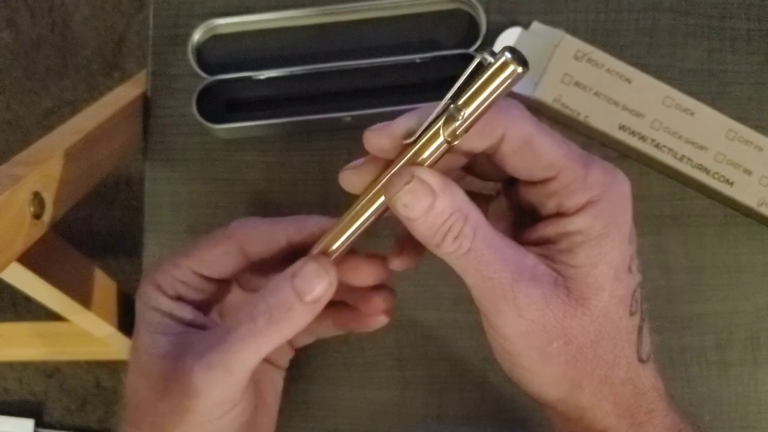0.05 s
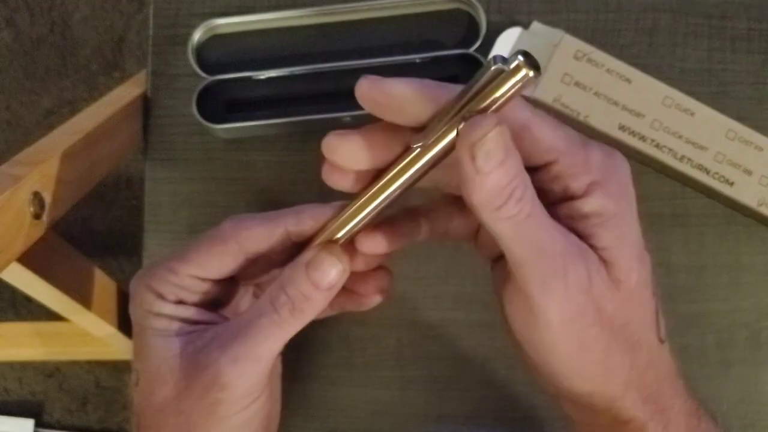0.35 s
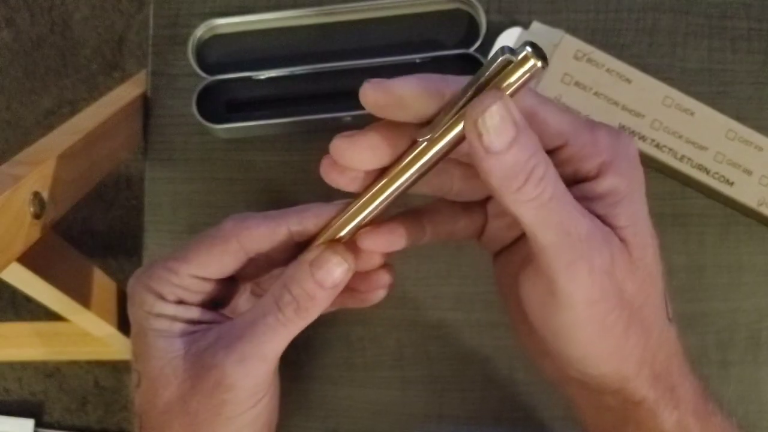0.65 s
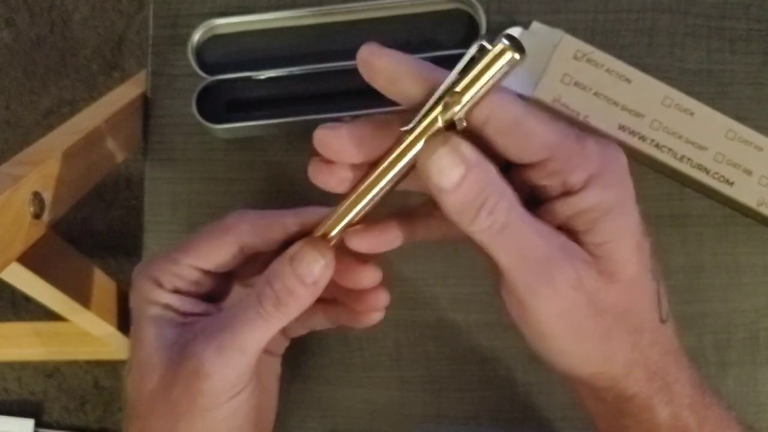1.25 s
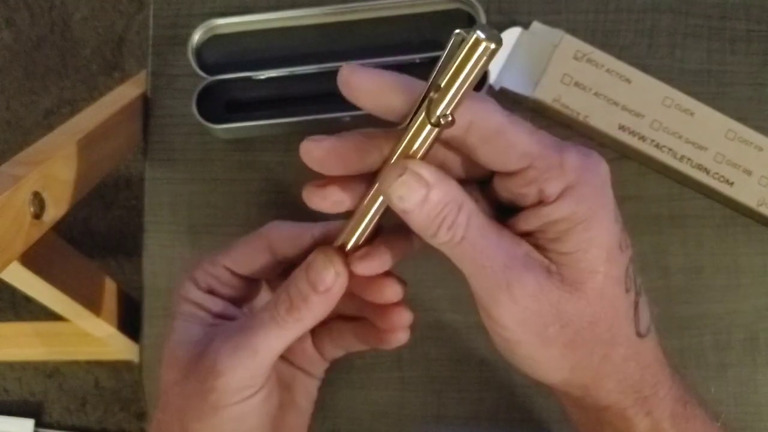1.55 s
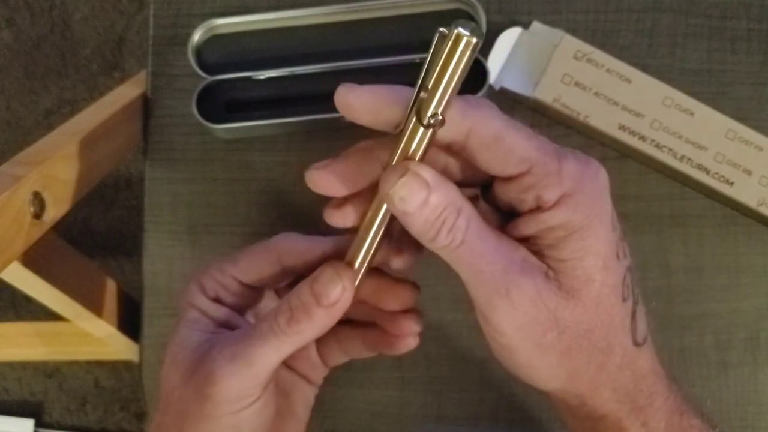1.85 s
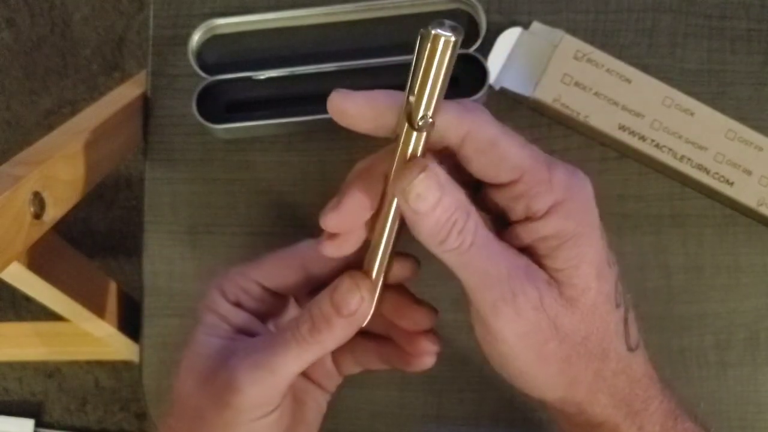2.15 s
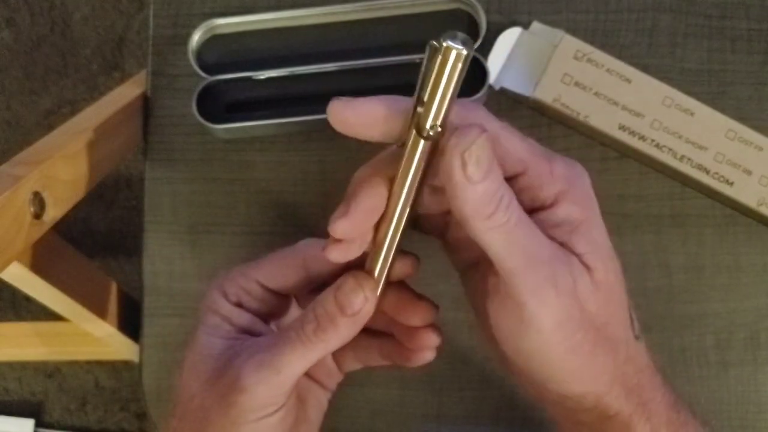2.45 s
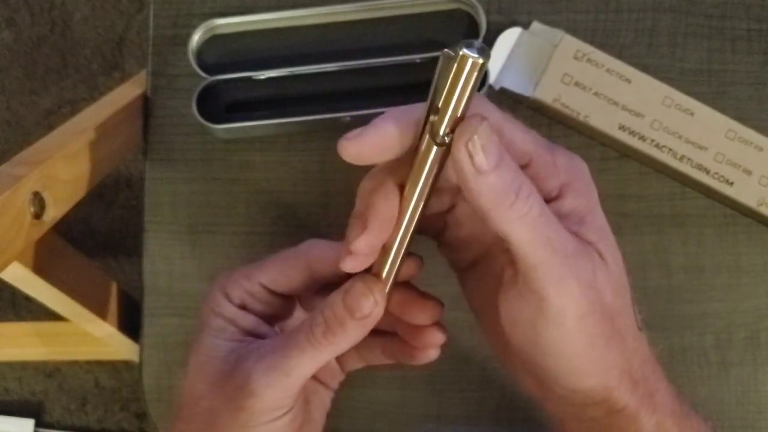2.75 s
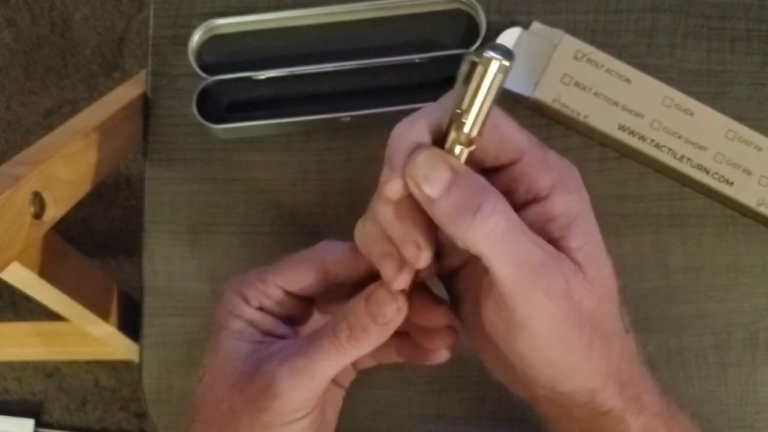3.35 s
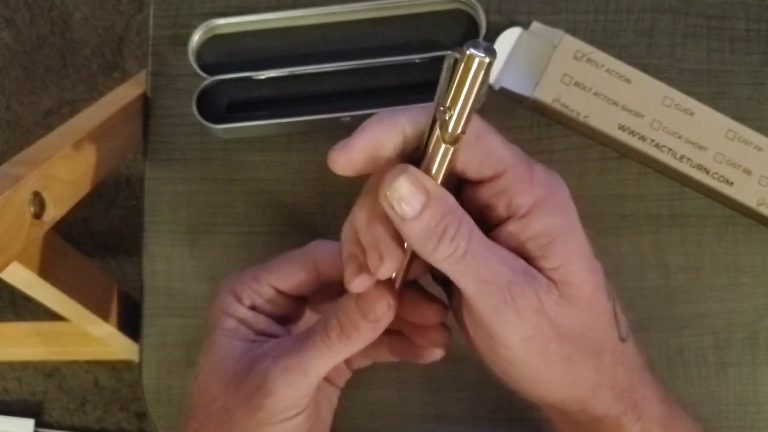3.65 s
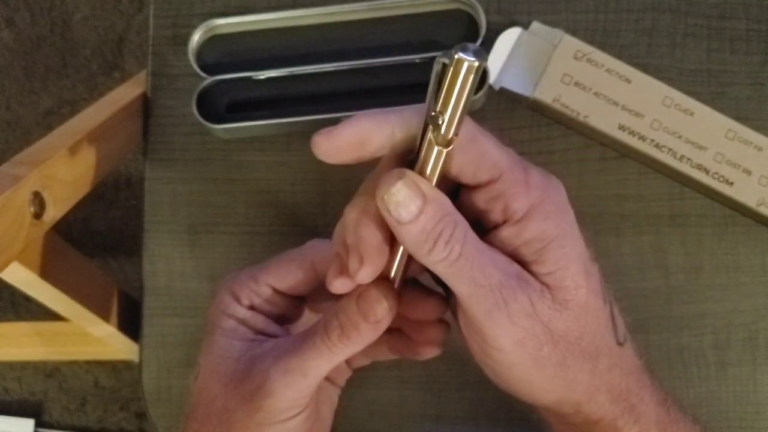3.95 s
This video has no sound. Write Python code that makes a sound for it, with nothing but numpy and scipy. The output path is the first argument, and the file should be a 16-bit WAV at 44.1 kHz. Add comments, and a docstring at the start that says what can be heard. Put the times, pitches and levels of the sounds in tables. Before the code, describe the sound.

Two sharp metallic snaps come from a pen's bolt, first locking and then springing home, with faint handling ticks before each. The pen is near the microphone, slightly right, in a small room with soft ventilation and fan hum.

```python
"""A metal bolt-action pen is worked by hand close by, a little to the right.
Fingers shift on it; the bolt scrapes along its slot and snaps into the lock, and a faint hiss lingers.
Later a thumbnail nudges it out and it springs home. Each snap is a blow and a rebound that
ring the modes of the pen, and a small room answers. Behind it, ventilation rushes and a fan hums."""
import sys
import numpy as np
from scipy import signal
from scipy.fft import rfft, irfft, next_fast_len
from scipy.io import wavfile
from scipy.ndimage import map_coordinates

SR = 44100
rng = np.random.default_rng(int(sys.argv[2]) if len(sys.argv) > 2 else 0)


def dump(signal):
    """Clip the signal to [-1, 1] and save it as 16-bit WAV at the path in sys.argv[1]."""
    limited = np.clip(np.atleast_2d(signal).T, -1, 1)
    pcm = np.round(limited * 32767).astype(np.int16)
    wavfile.write(sys.argv[1], SR, pcm)


N = 176400
TIME = np.arange(N) / SR
CONTACT_RISE_S = 0.00011


def amp(db):
    return 10 ** (np.asarray(db) / 20)


def unit_rms(x):
    return x / np.sqrt(np.mean(x ** 2) + 1e-20)


def decay(t, t60):
    """Exponential damping: 60 dB down after t60 seconds."""
    return np.exp(-np.log(1000) * t / t60)


def over_time(points):
    return np.interp(TIME, *np.transpose(points))


def over_frequency(points, hz):
    """Interpolate (Hz, value) points on a log axis."""
    knots, values = np.transpose(points)
    return np.interp(np.log(hz + 1), np.log(knots + 1), values)


def filtered(x, response):
    """Multiply the spectrum of x by a frequency response."""
    size = next_fast_len(x.shape[-1] + SR // 4)
    return irfft(rfft(x, size) * response(np.fft.rfftfreq(size, 1 / SR)), size)[..., :x.shape[-1]]


def coloured(x, gains_db):
    return filtered(x, lambda hz: amp(over_frequency(gains_db, hz)))


def tilted(x, slope_db):
    """Brighten or dull by slope_db an octave, between 4 and 16 kHz."""
    return filtered(x, lambda hz: amp(slope_db * np.log2(np.clip(hz, 4000, 16000) / 12000)))


def add(track, start_s, x):
    i = max(0, round(start_s * SR))
    track[..., i:i + x.shape[-1]] += x[..., :N - i]


def wobble(knots_per_s):
    """A smooth random curve."""
    knots = rng.standard_normal(int(N * knots_per_s / SR) + 4)
    return map_coordinates(knots, [TIME * knots_per_s])


def hum(hz, width_hz):
    """Narrow-band noise is heard as a wavering tone."""
    return unit_rms(filtered(rng.standard_normal(N), lambda f: 1 / (1 + ((f - hz) / width_hz * 2) ** 4)))


def ventilation():
    """Broadband air noise, coherent between the channels only in the bass, carries narrow duct tones."""
    # Each row: frequency in Hz, relative spectral density in dB.
    spectrum = [(20, -17), (40, -4.5), (50, -5), (62, -4.5), (76, 0.5), (110, -4), (140, -9), (200, -12.5),
                (260, -18.5), (380, -21), (600, -18), (880, -14), (1200, -21), (1500, -26), (1850, -22),
                (2300, -28), (3000, -38.5), (3500, -38), (4300, -43.5), (7000, -49), (9000, -65.5),
                (14000, -55)]
    # Each row: frequency in Hz, left-right correlation.
    coherence = [(60, 1), (100, 0.82), (160, 0.93), (300, 0.71), (600, 0), (1200, 0), (10000, 0.068)]
    # Each row: frequency in Hz, bandwidth in Hz, level in dB.
    duct_tones = [(65.2, 17.8, -51.5), (283.2, 4.4, -74.5), (895, 32, -74)]
    # Each row: time in seconds, gain in dB; for a fading whir, a swelling whir and the whole mix.
    fading_db = [(0, -66), (.12, -57), (.45, -62), (.8, -63), (1.15, -70.5), (1.5, -64.5), (1.9, -73.5)]
    swelling_db = [(0, -73), (1.7, -75.5), (2.27, -61), (2.6, -69), (3.1, -61.5), (4, -73)]
    overall_db = [(0, 1.05), (1.2, 0), (2.0, -0.17), (3.3, .5), (3.55, -2.5), (4, -2.5)]

    def mid_side_gains(hz):
        angle = np.arccos(np.clip(over_frequency(coherence, hz), -1, 1)) / 2
        return amp(over_frequency(spectrum, hz)) * [np.cos(angle), np.sin(angle)]

    mid, side = filtered(rng.standard_normal((2, N)), mid_side_gains)
    air = amp(-48.5) * unit_rms(np.array([mid + side, mid - side]))
    tones = sum(amp(db) * hum(hz, width) for hz, width, db in duct_tones)
    low_whir = amp(over_time(fading_db)) * hum(483, width_hz=77)
    high_whir = amp(over_time(swelling_db)) * hum(879, width_hz=130)
    return (air + tones + low_whir + high_whir) * amp(over_time(overall_db))


def fan_drone():
    """The fan's low hum is a sinusoid slowly modulated in amplitude and frequency."""
    # Each row: time in seconds, level in dB before trim and flutter.
    swells = [(0.0, -41), (0.76, -52), (0.821, -41), (1.43, -48), (1.57, -39), (1.88, -64), (1.92, -47.5),
              (2.1, -43), (2.33, -61), (2.57, -39.5), (2.95, -52.5), (3.02, -42), (3.29, -48), (3.4, -72.5),
              (3.54, -41), (3.59, -61), (3.64, -41.5), (4.0, -61)]
    trim_db, flutter_db = -1.5, 2
    level_db = over_time(swells) + trim_db + flutter_db * wobble(8.9)
    pitch_hz = 91.36 + 2 * wobble(6.5)
    return np.sqrt(2) * amp(level_db) * np.sin(2 * np.pi * np.cumsum(pitch_hz) / SR)


def metal_contact(stroke=0, delay_s=0):
    """An impact excites the pen's damped modes and a crack of noise; stroke 0 locks, 1 springs home."""
    # Each row: frequency in Hz, T60 in seconds, level in dB on locking, level in dB on springing home.
    modes = [(347, 0.016, -52, -26), (1400, 0.00307, -36.5, -18.5), (2230, 0.006, -38.5, -17),
             (3550, 0.0022, -26.5, -33), (4125, 0.0045, -23, -17.5), (4980, 0.0058, -13.5, -15),
             (6050, 0.007, -15, -10), (7070, 0.0046, -12.5, -9.5), (8040, 0.0058, -13.5, -9.5),
             (9330, .0035, -11.5, -4.5), (10320, 0.0022, -6, -2.5), (11370, 0.003, -3.5, -0.5),
             (12230, 0.006, -6, -2.5), (13550, 0.0049, -0.5, -2.5), (14150, .004, -4.5, -2.5)]
    t = np.maximum(np.arange(SR // 25) / SR - delay_s, 0)
    ring = sum((-1) ** k * amp(levels[stroke]) * np.sin(2 * np.pi * hz * t) * decay(t, t60)
               for k, (hz, t60, *levels) in enumerate(modes))
    crack = np.diff(rng.standard_normal(len(t) + 1)) / 2 * decay(t, t60=0.017)
    return (ring + amp(-10.5) * crack) * (1 - np.exp(-t / CONTACT_RISE_S))


def bolt_slides():
    """Stick-slip friction: a dense random train of tiny slips rings the pen."""
    # Each row: start in seconds, length in seconds, level in dB, treble tilt in dB per octave.
    slides = [(.0, .12, -71, -10), (0.634, 0.031, -75, -1), (0.935, 0.013, -45.5, 9),
              (0.991, .003, -49, -5), (0.948, 0.25, -68, -5), (2.975, 0.066, -77.5, 3),
              (3.14, .01, -73.5, -3.5)]
    slips_per_s, rise_s, fall_s = 3100, 0.0017, 0.0055
    out, t = np.zeros(N), np.arange(SR // 2) / SR
    for start, length, db, tilt_db in slides:
        slips = rng.standard_normal(len(t)) * (rng.random(len(t)) < slips_per_s / SR)
        scrape = signal.fftconvolve(slips, metal_contact())[:len(t)]
        envelope = (1 - np.exp(-t / rise_s)) * np.exp(-np.maximum(t - length, 0) / fall_s)
        add(out, start, amp(db) * unit_rms(tilted(scrape, tilt_db)) * envelope)
    return out


def soft_hisses():
    """Swells of filtered noise. At 1.283 s a faint treble hiss lingers after the lock snap;
    the others are the friction of fingers shifting on the barrel."""
    # Each row: start in seconds, length in seconds, level in dB.
    swells = [(0.27, 0.37, -75), (0.623, 0.15, -79), (0.867, 0.138, -68.5), (1.283, 0.16, -76),
              (1.803, 0.046, -67.5), (1.956, 0.057, -69), (2.253, .06, -78.5), (3.624, 0.046, -71.5)]
    # Each row: frequency in Hz, relative level in dB.
    hiss_spectrum = [(500, -17), (3500, 13.5), (6000, 7), (9000, 0.5), (14000, -10)]
    out, t = np.zeros(N), np.arange(SR // 2) / SR
    for start, length, db in swells:
        hiss = unit_rms(coloured(rng.standard_normal(len(t)), hiss_spectrum))
        arch = np.sin(np.pi * np.minimum(t / length, 1)) ** .5
        add(out, start, amp(db) * hiss * arch)
    return out


def bolt_ticks():
    """Light impacts of the bolt in its slot excite the pen's modes weakly."""
    # Each row: start in seconds, gain in dB, treble tilt in dB per octave.
    ticks = [(.6397, -58, 6), (2.984, -67, -1), (3.1462, -57, -6), (3.298, -65.5, -4), (3.3471, -28, -14)]
    out = np.zeros(N)
    for start, db, tilt_db in ticks:
        add(out, start, amp(db) * tilted(metal_contact(), tilt_db))
    return out


def bolt_snaps():
    """Elastic collision: the sprung bolt hits its stop and rebounds once. Gives direct sound and tail."""
    # Each row: start in seconds, gain in dB, rebound re blow in dB, their likeness in the room (0-1).
    strokes = [(1.0975, -8.5, 1.5, .6), (3.3480, -8, -1, .1)]
    # Each entry: gap from blow to rebound in seconds.
    gaps = [.000905, .000845]
    direct, coherent, incoherent = np.zeros((3, N))
    for stroke, (start, db, rebound_db, likeness) in enumerate(strokes):
        blow = amp(db) * metal_contact(stroke)
        rebound = amp(db + rebound_db) * metal_contact(stroke, gaps[stroke])
        add(direct, start, blow + rebound)
        # The rebound stirs the room only partly as the blow did.
        add(coherent, start, blow + likeness * rebound)
        add(incoherent, start, np.sqrt(1 - likeness ** 2) * rebound)
    return direct, reverberation(coherent) + reverberation(incoherent)


def nail_ticks():
    """The impact of the thumbnail on the bolt rings a few heavily damped modes."""
    # Each row: start in seconds, gain in dB.
    touches = [(3.0293, -51), (3.1453, -48), (3.6792, -66)]
    # Each row: frequency in Hz, T60 in seconds, relative level in dB.
    modes = [(4800, .009, 0.5), (7040, 0.0048, 1), (13000, 0.0047, -12.5)]
    out, t = np.zeros(N), np.arange(SR // 2) / SR
    ring = sum(amp(db) * np.sin(2 * np.pi * hz * t) * decay(t, t60) for hz, t60, db in modes)
    for start, db in touches:
        add(out, start, amp(db) * ring * (1 - np.exp(-t / CONTACT_RISE_S)))
    return out


def early_echoes(x):
    """Reflection from the walls adds delayed, weaker copies to the direct sound."""
    # Each row: delay in seconds, gain in dB.
    walls = [(.0045, -22), (0.0107, -23.5), (0.0226, -19)]
    out = x.copy()
    for delay, db in walls:
        add(out, delay, amp(db) * x)
    return out


def from_the_right(x, lag_s=.0003):
    """Acoustic shadow: the left microphone faces away and hears the pen duller and later."""
    # Each row: frequency in Hz, gain in dB.
    shadow = [(300, -2), (1800, -12), (5000, -21), (9500, -12), (13000, -10)]
    left = filtered(x, lambda hz: amp(over_frequency(shadow, hz)) * np.exp(-2j * np.pi * hz * lag_s))
    return np.array([left, x])


def reverberation(x, delay_s=0.00083, build_s=0.012):
    """A diffuse field builds up and decays exponentially, differently at each microphone."""
    # Each row: frequency in Hz, reverberation time in seconds.
    t60s = [(300, 0.25), (2000, 0.21), (5000, 0.29), (9000, 0.25), (14000, 0.21)]
    # Each row: frequency in Hz, gain of the tail in dB.
    tail_colour = [(300, -12), (520, -0.5), (1600, -1.5), (2600, -7.5), (4300, -6), (5600, -9.5),
                   (9300, -7.5), (10400, -7), (11500, -6), (13000, -7)]
    hz, t, bands = signal.stft(rng.standard_normal((2, SR // 2)), SR, nperseg=256)
    tail = signal.istft(bands * decay(t, over_frequency(t60s, hz)[:, None]), SR, nperseg=256)[1]
    age = np.maximum(np.arange(tail.shape[1]) / SR - delay_s, 0)
    tail *= 1 - np.exp(-(age / build_s) ** 2)
    wet = signal.fftconvolve(x[None], tail / np.linalg.norm(tail[0]), axes=1)[:, :N]
    return coloured(wet, tail_colour)


def scene():
    """Superposition of the pen, its echoes and reverberation, and the ventilation."""
    snaps, snap_tails = bolt_snaps()
    faint = bolt_ticks() + bolt_slides() + soft_hisses() + nail_ticks()
    pen = from_the_right(early_echoes(snaps + faint))
    return pen + snap_tails + reverberation(faint) + ventilation() + fan_drone()


def record(dry):
    """The two microphones differ in response; soft saturation rounds the peaks before a steep low-pass."""
    # Each row: frequency in Hz, gain of left against right in dB.
    left_response = [(200, 0.5), (500, 3), (1050, 2), (1650, 12.5), (2300, 6), (3100, 11), (3700, 9.5),
                     (4300, 1), (5200, 3), (7000, -4), (9500, -0.5), (13000, -8.5)]
    ceiling, cutoff_hz = amp(-1.5), 14650
    channels = np.array([coloured(dry[0], left_response), dry[1]])
    rounded = ceiling * np.tanh(channels / ceiling)
    return filtered(rounded, lambda hz: 1 / (1 + (hz / cutoff_hz) ** 160))


dry = scene()
out = record(dry)
dump(out)
```